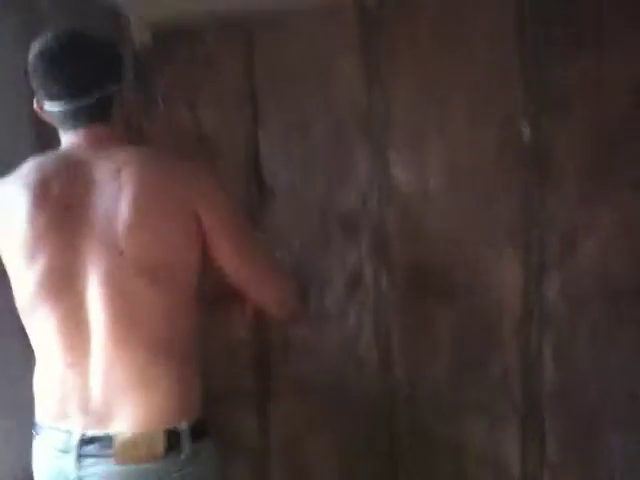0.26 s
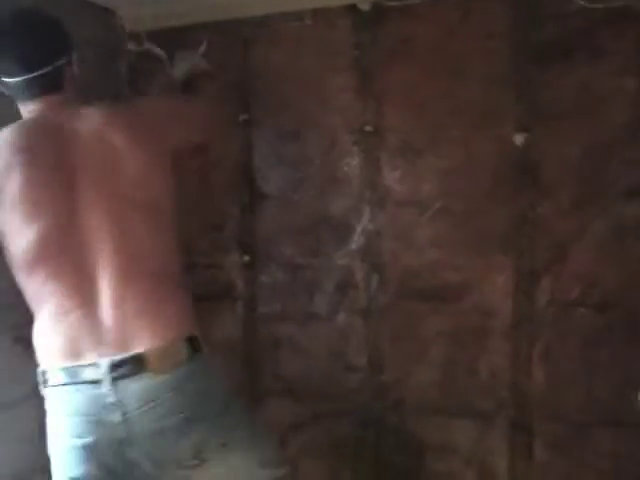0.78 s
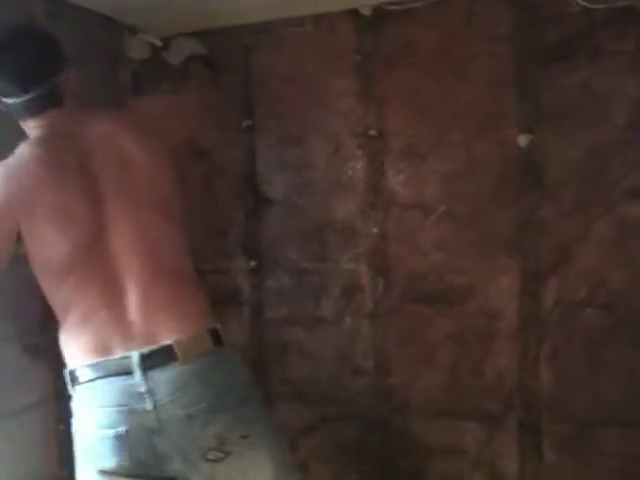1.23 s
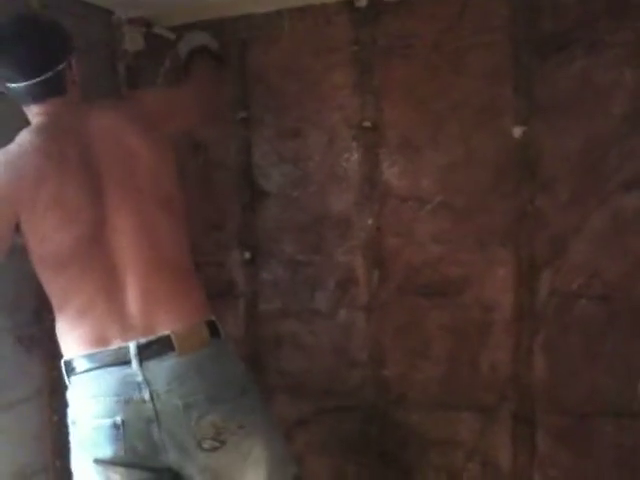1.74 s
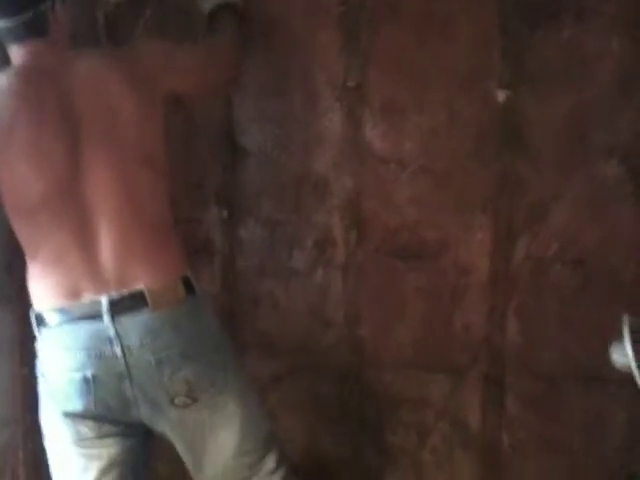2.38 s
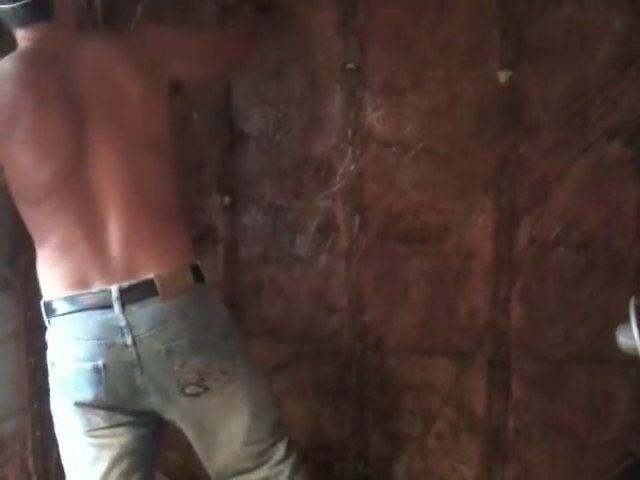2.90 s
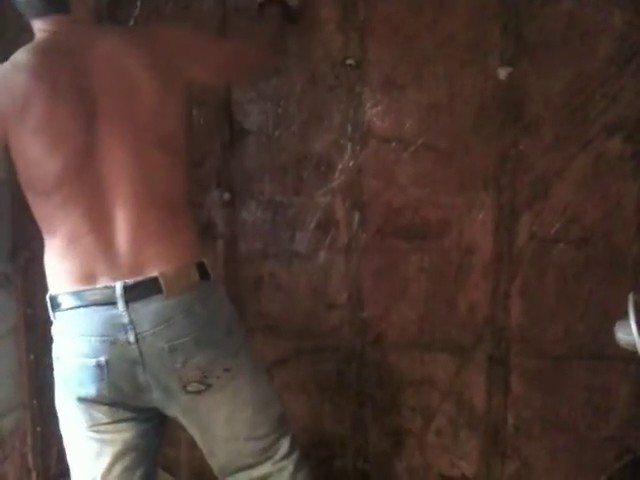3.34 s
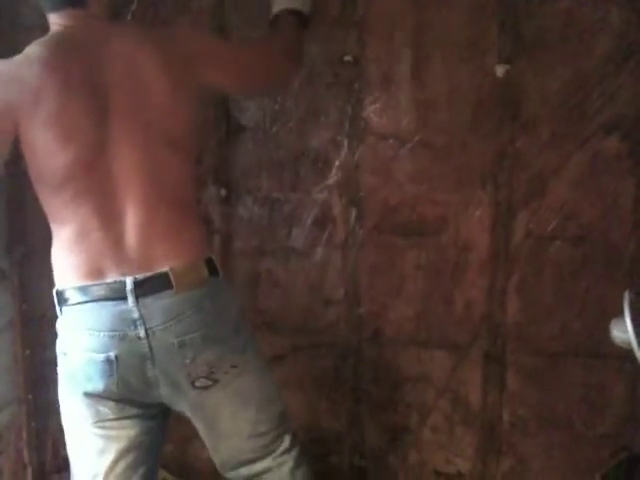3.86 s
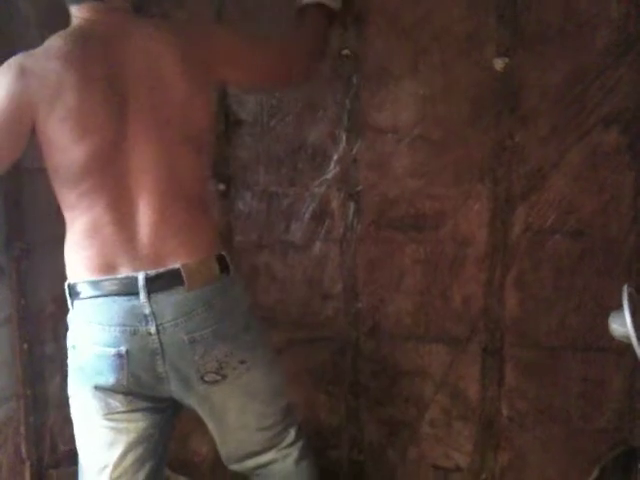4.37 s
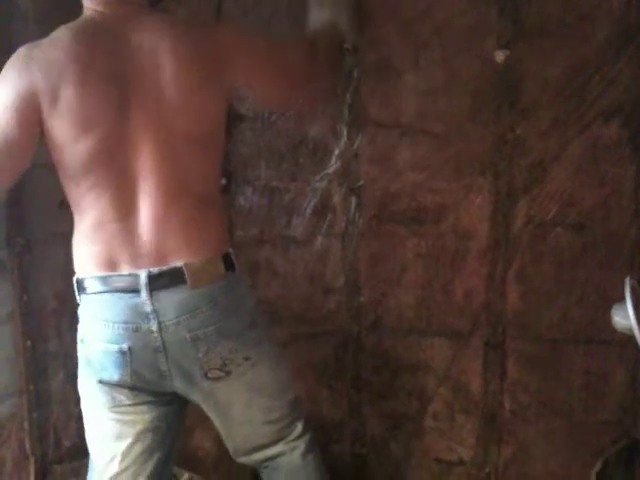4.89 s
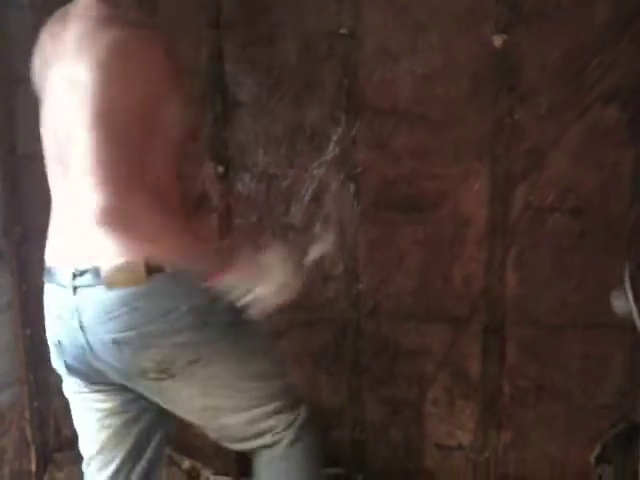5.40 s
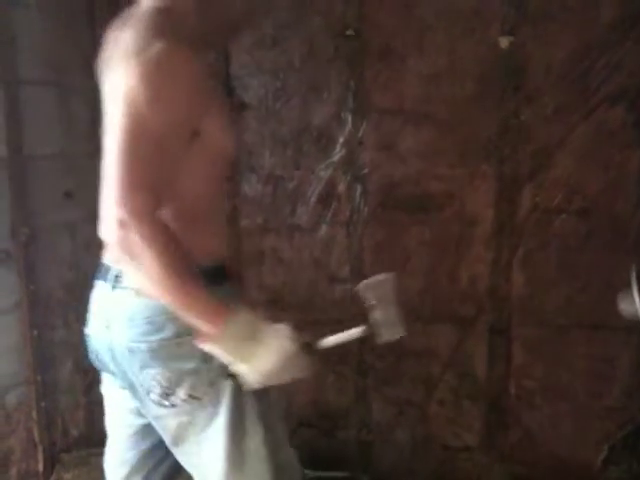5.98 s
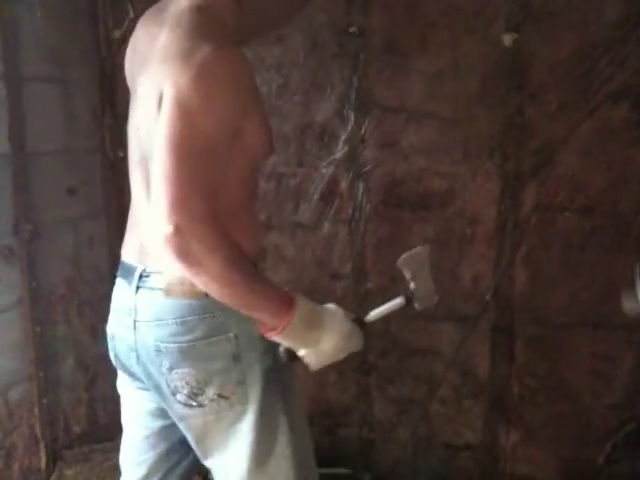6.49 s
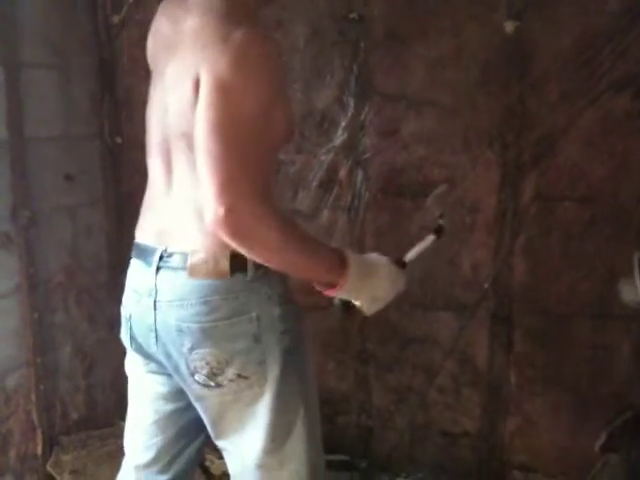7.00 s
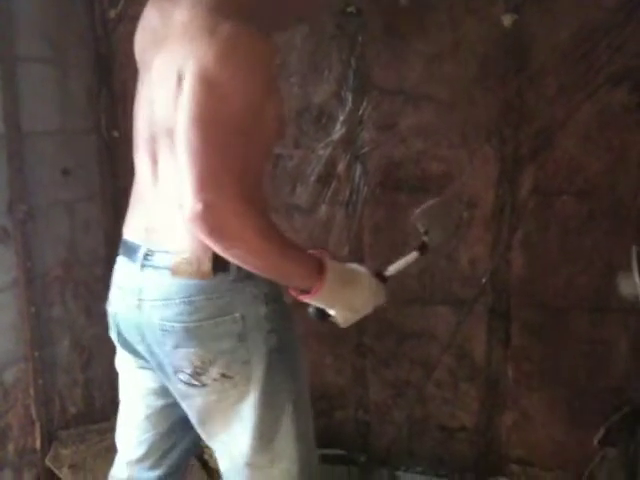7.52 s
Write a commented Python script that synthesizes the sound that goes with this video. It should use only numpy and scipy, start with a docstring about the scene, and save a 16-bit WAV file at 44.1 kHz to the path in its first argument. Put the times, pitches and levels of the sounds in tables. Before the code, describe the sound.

Rapid hatchet blows crack wall tile in a small bare room; shards clatter and clink to the floor, then scattered debris and grit settle.

```python
"""Small bare room: a hatchet knocks tile and mortar off a wall.
Each blow is a crackle burst that cracks the tile broadly and rings the low modes of the wall.
Pieces land as short clacks, some with a sharp tick; shards, blade and a large tile ring in damped modes.
Random clicks form showers of grit and the trickle after each blow.
Filtered noise makes a faint hum and hiss; a limiter holds the loudest blows."""
import sys
import numpy as np
from scipy import signal
from scipy.io import wavfile
from scipy.ndimage import uniform_filter1d, minimum_filter1d

SR = 44100
rng = np.random.default_rng(int(sys.argv[2]) if len(sys.argv) > 2 else 0)


def voltage_ratio(level):
    """Linear amplitude factor for a level in decibels (scalar or array-like)."""
    return 10 ** (np.asarray(level, float) / 20)


def master_out(mix):
    """Clip the mix to full scale and print it as 16-bit PCM to the path in sys.argv[1]."""
    frames = np.transpose(np.atleast_2d(mix))
    ceiling = np.clip(frames, -1, 1)
    pcm = np.round(ceiling * 32767).astype(np.int16)
    wavfile.write(sys.argv[1], SR, pcm)


N = 341289   # samples

# hatchet on wall: [t/s, level/dB, hollow thump/dB, sizzle/dB]
BLOWS = [(1.265, -8, 12, -5), (1.559, -8, 11, -4.5), (1.841, -5, 6, -8.5), (2.134, -3, -2, -8),
         (2.393, -4, -2.5, -10), (2.664, -6, 0.5, -1), (2.938, -3.5, -5.5, -7.5), (3.506, 3, -9, -13.5),
         (4.073, -3.5, -4, -9.5), (4.603, -1, -15.5, -11), (4.873, -5, -6, -2.5)]
# wall modes: [f/Hz, level/dB, t60/s]
WALL_MODES = [(150, -8, .09), (370, -8, .07), (517, 3, .06), (670, 1, .05)]
# broadband spectrum of contacts and grit: [f/Hz, level/dB per Hz]
CRACK_SPECTRUM = [(85, -22), (137, 1.5), (480, -1), (1000, 1), (3500, -0.5), (6000, 5), (9000, 8),
                  (11500, 0), (14000, -12), (17000, -12)]
# pieces landing, small ones bright, heavy ones dull: [t/s, level/dB, tilt/dB per octave]
PIECES = [(0.128, -3.5, -1.2), (0.216, -11, -2.5), (0.328, -30, 0.5), (0.379, -15.5, -2.5),
          (0.985, -16.5, -2.5), (1.099, -21.5, -3.5), (1.255, -28, -1), (2.115, -46, -10.5),
          (2.506, -6.5, -0.5), (2.57, -10, -2), (2.91, -34, 2), (3.05, -16, -0.8), (3.23, -17.5, -3.5),
          (3.538, 5.5, 1.5), (3.599, -10.5, 3), (3.787, -26, -8), (3.882, -12, 0.1), (4.149, -6.5, 1),
          (4.278, -6.5, -2.2), (4.299, -15, -1), (4.308, -1, 0.5), (4.339, 1, 0.5), (4.432, -19, -0.5),
          (4.542, -34, 5.5), (4.789, -37.5, 10), (4.993, -7.5, -1.5), (5.305, -24, -3.5),
          (5.314, -18.5, -2), (5.346, -17, -1), (5.469, -19.5, 3.5), (5.493, -15.5, 0.5),
          (5.553, -17.5, 1.5), (5.571, -4.5, 0), (5.604, -7.5, -1), (5.807, -7, -2.5), (5.876, -14, -2.5),
          (5.957, -17, -5.5), (6.025, -17, -4), (6.181, -16, -3.5), (6.519, -8.5, -4), (6.875, -29.5, -5.5),
          (7.079, -27, -5.5), (7.175, -28, -5), (7.235, -28, 2), (7.367, -18, -0.3), (7.637, -29.5, -2.5),
          (7.716, -19.5, 4.5)]
# colour of a landing of middling size: [f/Hz, level/dB]
CLACK_COLOUR = [(110, -9.5), (500, -0.5), (3500, 5.5), (10000, -2.5)]
# short ringing notes of shards, the hatchet blade and a scrape, some struck together:
# [t/s, level/dB, f/Hz]
SHORT_NOTES = [(0.131, -27, 2790), (0.324, -41.5, 2850), (0.385, -31, 570), (.95, -35, 1075),
               (1.762, -49.5, 6400), (2.393, -15.5, 3390), (2.393, -27.5, 1930), (2.565, -28.5, 1170),
               (2.668, -8.5, 8500), (2.94, -13, 8570), (2.506, -24.5, 1850), (2.507, -25, 4800),
               (2.828, -40.5, 4750), (3.602, -15.5, 8600), (4.343, -11.5, 6260), (4.346, -14, 8400),
               (4.344, -17.5, 10180), (4.432, -30, 9300), (4.997, -19, 9550), (4.077, -17, 3820),
               (4.603, -14, 5750), (4.609, -19, 1020), (4.605, -17, 2465), (4.61, -16, 7300),
               (5.246, -33.5, 6660), (5.257, -41, 5800), (5.33, -28, 5760), (5.606, -20.5, 6270),
               (7.25, -44, 5200), (6.502, -28, 6040), (6.521, -29, 6050), (6.518, -22.5, 8350),
               (6.521, -21, 10400), (6.679, -42, 5880), (7.721, -39.5, 9470)]
# large tile knocking about: [t/s, level/dB]
TILE_KNOCKS = [(3.736, -38.5), (4.148, -8.5), (4.304, -11.5), (4.429, -29)]
# modes of that tile: [f/Hz, level/dB, t60/s]
TILE_MODES = [(2085, -14.5, 0.084), (2522, -15.5, 0.058), (3400, -16.5, .05), (5930, -12, .07),
              (6170, -7, 0.03), (6960, -9, .04), (7360, -8, .05), (9700, -25, .03), (10500, -19.5, .03)]
# sharp ticks, most at the onset of a landing piece: [t/s, level/dB, f/Hz]
TICKS = [(5.496, -8, 6300), (5.577, -14, 3480), (5.805, -4.5, 7100), (5.958, -15, 7700),
         (6.028, -11.5, 7740), (7.09, -22.5, 8050), (7.237, -30, 4640), (7.338, -37, 6000),
         (7.367, -22, 8500)]
# showers of grit and scuffs: [full from t/s, hold/s, fine grit level/dB, coarse crumb level/dB]
SHOWERS = [(0, .1, -62, -69), (0.648, 0.072, -66, -58), (0.948, 0.0064, -43.5, -45.5),
           (2.074, 0.018, -49.5, -83), (2.766, 0.045, -49, -52.5), (3.732, 0.024, -45, -49),
           (4.197, 0.066, -37, -63), (5.13, 0.014, -45, -59.5), (5.328, 0.0066, -38.5, -46.5),
           (5.485, 0.0096, -39, -44), (5.612, 0.059, -37.5, -43.5), (5.91, 0.13, -42, -44),
           (6.334, 0.037, -48, -57), (6.443, 0.028, -47.5, -52.5), (6.65, 0.0072, -47, -52),
           (6.817, 0.014, -52, -57.5), (7.062, 0.046, -50, -56), (7.287, 0.1, -49.5, -58),
           (7.384, 0.28, -47, -55.5)]
# decay of the room: [f/Hz, t60/s]
ROOM_T60 = [(100, 0.25), (260, 0.25), (700, 0.16), (1840, 0.18), (4850, 0.22), (12800, 0.16)]
# relative spectrum of hiss and rumble: [f/Hz, level/dB per Hz]
AIR_SPECTRUM = [(24, -57), (40, -46.5), (233, 7.5), (510, -2), (639, -2), (4680, -14.5), (6020, -8),
                (8570, -10.5), (14500, -29), (16500, -48)]
# hum tones: [f/Hz, rms level/dB]
HUM = [(242.2, -66.5), (360.7, -72.5)]
# half-octave bands
EDGES_HZ = 40 * 2 ** np.arange(0, 9.1, .5)
CENTRES_HZ = np.sqrt(EDGES_HZ[1:] * EDGES_HZ[:-1])


def rms_one(x):
    """Scale to unit rms."""
    return x / np.sqrt(np.mean(x ** 2) + 1e-20)


def at_hz(points, hz):
    """Read a (f/Hz, value) table on a log frequency axis."""
    points = np.array(points)
    return np.interp(np.log(hz), np.log(points[:, 0]), points[:, 1])


def band(x, k):
    """Half-octave band k; signs alternate so that neighbours add at their edges."""
    sos = signal.butter(2, EDGES_HZ[k:k + 2], "band", fs=SR, output="sos")
    return (-1) ** k * signal.sosfilt(sos, x + 1e-18)


def ring(push, hz, t60_s):
    """Two-pole resonator: a unit click sets a decaying sine of about unit height ringing."""
    r = voltage_ratio(-60 / (t60_s * SR))
    w = 2 * np.pi * min(hz, 18000) / SR
    return signal.lfilter([0, np.sin(w)], [1, -2 * r * np.cos(w), r * r], push + 1e-18)


def grains(count, per_s, spread_db):
    """Random clicks of uneven size and sign; rms 1."""
    born = rng.random(count) < per_s / SR
    size_db = spread_db * np.minimum(rng.exponential(1, count), 4)
    return rms_one(born * voltage_ratio(size_db) * rng.choice([-1, 1], count))


def contact(crackle, t_s, decay_ms, rise_ms):
    """Start sample and dying crackle of one contact (exponential time constants)."""
    i = round(t_s * SR)
    t = np.arange(min(SR // 4, N - i)) / SR
    shape = (1 - np.exp(-1000 * t / rise_ms)) * np.exp(-1000 * t / decay_ms)
    push = crackle[i:i + len(t)] * shape
    # the impact sets the energy, not the grain
    return i, push * np.sqrt(np.sum(shape ** 2) / np.sum(push ** 2))


def blows(crackle):
    """The tile cracks broadly; the wall thumps in its low modes, less as it breaks up."""
    crumble_ms, wall_db = 5.1, -43
    knock_db, knock_per_thump = -1.5, 0.5
    contacts, thumps = [], np.zeros(N)
    chance_db = rng.normal(0, 2.0, (len(BLOWS), len(WALL_MODES)))
    for (t_s, db, thump_db, sizzle_db), luck_db in zip(BLOWS, chance_db):
        i, push = contact(crackle, t_s, crumble_ms, rise_ms=0.64)
        mid_db = knock_db + knock_per_thump * thump_db
        colour = [(250, db + thump_db), (1200, db + mid_db), (4000, db), (10000, db + sizzle_db)]
        contacts.append((i, push, colour))
        for (hz, mode_db, t60_s), mode_luck_db in zip(WALL_MODES, luck_db):
            gain = voltage_ratio(wall_db + db + thump_db + mode_db + mode_luck_db)
            thumps[i:i + len(push)] += gain * ring(push, hz, t60_s)
    return contacts, thumps


def pieces(crackle):
    """Each landing is a short clack, tilted about its middle pitch by the size of the piece."""
    middle_hz = CLACK_COLOUR[2][0]
    contacts = []
    for t_s, db, tilt in PIECES:
        i, push = contact(crackle, t_s, 2.87, rise_ms=4.94)
        colour = [(hz, db + level + tilt * np.log2(hz / middle_hz)) for hz, level in CLACK_COLOUR]
        contacts.append((i, push, colour))
    return contacts


def cracks(contacts, wet_db, uneven_db):
    """Contacts in unevenly coloured bands; their energy fills the room as a dying diffuse field."""
    out, white = np.zeros(N), rng.standard_normal(N)
    uneven = rng.normal(0, uneven_db, (len(contacts), len(CENTRES_HZ)))
    for k, hz in enumerate(CENTRES_HZ):
        push = np.zeros(N)
        for (i, crackle, colour), own_db in zip(contacts, uneven):
            push[i:i + len(crackle)] += crackle * voltage_ratio(at_hz(colour, hz) + own_db[k])
        r = voltage_ratio(-120 / (at_hz(ROOM_T60, hz) * SR))   # energy falls 60 dB in t60
        stored = signal.lfilter([1 - r], [1, -r], push ** 2 + 1e-18)
        diffuse = voltage_ratio(wet_db) * np.sqrt(stored) * white
        out += voltage_ratio(at_hz(CRACK_SPECTRUM, hz)) * band(push + diffuse, k)
    return out


def chimes(crackle):
    """Each note is three randomly detuned close modes driven by crackle, so it rings roughly."""
    notes = [(t_s, db, hz, .018) for t_s, db, hz in SHORT_NOTES]
    for t_s, db in TILE_KNOCKS:
        notes += [(t_s, db + mode_db, hz, t60_s) for hz, mode_db, t60_s in TILE_MODES]
    # seven clinks at random high pitches colour each landing
    pitches_hz = 3500 * 2 ** rng.uniform(0, 1.7, (len(PIECES), 7))
    for (t_s, db, _), clinks_hz in zip(PIECES, pitches_hz):
        notes += [(t_s, db - 24.0, hz, 6.3 / hz) for hz in clinks_hz]
    out = np.zeros(N)
    detune = 1 + rng.normal(0, .011, (len(notes), 3))
    for (t_s, db, hz, t60_s), ratios in zip(notes, detune):
        i, push = contact(crackle, t_s, 9.5, rise_ms=1.0)
        push = voltage_ratio(db) * push / np.sqrt(np.sum(push ** 2))
        out[i:i + len(push)] += sum(ring(push, hz * ratio, t60_s) for ratio in ratios)
    return out


def ticks():
    """One click into a heavily damped resonator, which falls 60 dB in 28 cycles."""
    out = np.zeros(N)
    for t_s, db, hz in TICKS:
        click = np.zeros(SR // 50)
        click[0] = voltage_ratio(db)
        out[round(t_s * SR):][:len(click)] += ring(click, hz, 28 / hz)
    return out


def grit_flow():
    """Fine and coarse gain: showers swell, hold, thin; blows leave a slow trickle; powers add."""
    swell_db_per_s, thin_db_per_s = 480, 119
    trickle_db, trickle_thins_db_per_s, trickle_coarse_db = -52.5, 36, -5
    t = np.arange(0, N + 64, 64) / SR
    power = 0
    for t_s, hold_s, *db in SHOWERS:
        swell_db = swell_db_per_s * np.maximum(t_s - t, 0)
        thin_db = thin_db_per_s * np.maximum(t - t_s - hold_s, 0)
        power = power + voltage_ratio(np.array(db)[:, None] - swell_db - thin_db) ** 2
    fine_coarse = voltage_ratio(np.array([[0], [trickle_coarse_db]]))
    for t_s, db, *_ in BLOWS:
        trickle = (t > t_s) * voltage_ratio(db + trickle_db - trickle_thins_db_per_s * (t - t_s))
        power = power + (trickle * fine_coarse) ** 2
    return [np.interp(np.arange(N) / SR, t, np.sqrt(p)) for p in power]


def grit():
    """Dense tiny impacts: fine grit is bright and some chips clink, crumbs and scuffs are dull."""
    split_hz = 2600
    fine_gain, coarse_gain = grit_flow()
    fine, coarse = grains(N, 2500, 4), grains(N, 900, 4.5)
    bright, dull = np.zeros(N), np.zeros(N)
    for k, hz in enumerate(CENTRES_HZ):
        gain = voltage_ratio(at_hz(CRACK_SPECTRUM, hz))
        if hz > split_hz:
            bright += gain * band(fine, k)
        else:
            dull += gain * band(coarse, k)
    clink_hz = np.geomspace(3800, 10500, num=14)
    clinks = sum(ring(grains(N, 12, 4.0), hz, 90 / hz) for hz in clink_hz)
    bright = rms_one(bright) + voltage_ratio(-10.5) * rms_one(clinks)
    return fine_gain * bright + coarse_gain * rms_one(dull)


def room(x, wet_db):
    """Dense reflections that build in a few ms and die band by band."""
    t = np.arange(SR // 2) / SR
    white = rng.standard_normal((2, len(t)))
    tail = np.zeros(len(t))
    for k, hz in enumerate(CENTRES_HZ):
        tail += band(white[k % 2], k) * voltage_ratio(-60 * t / at_hz(ROOM_T60, hz))
    tail *= 1 - np.exp(-t / 0.0018)
    tail /= np.sqrt(np.sum(tail ** 2))
    return x + voltage_ratio(wet_db) * signal.fftconvolve(x, tail)[:N]


def air():
    """Steady hiss and rumble from banded noise; noise-driven resonators give two wavering hums."""
    white = rng.standard_normal((2, N))
    hiss = sum(voltage_ratio(at_hz(AIR_SPECTRUM, hz)) * band(white[k % 2], k) for k, hz in enumerate(CENTRES_HZ))
    hum = sum(voltage_ratio(db) * rms_one(ring(white[0], hz, 0.99)) for hz, db in HUM)
    return voltage_ratio(-64) * rms_one(hiss) + hum


def scene():
    """Everything on the wall and floor sounds in the same room, over the air."""
    crackle = grains(N, 9000, 2.3)
    struck, thumps = blows(crackle)
    broad = cracks(struck + pieces(crackle), wet_db=4.5, uneven_db=1.5)
    ringing = room(thumps + chimes(crackle) + grit(), wet_db=0.5)
    sharp = room(ticks(), wet_db=-4.0)
    return (broad + ringing + sharp + air())[None]


def band_limit(x):
    """A steep low-pass at the top of the band."""
    return signal.sosfilt(signal.butter(12, 16960, fs=SR, output="sos"), x)


def record(dry):
    """A low-pass cuts the top near 17 kHz, a high-pass thins the deep bass, a fast limiter holds the blows."""
    x = signal.sosfilt(signal.cheby2(10, 50, 16900, fs=SR, output="sos"), dry)
    x = signal.sosfilt(signal.butter(2, 85, "high", fs=SR, output="sos"), x)
    ceiling_gain = np.minimum(1, .76 / (np.abs(x) + 1e-9))
    # hold the lowest gain, then ease in and out of it
    gain = uniform_filter1d(minimum_filter1d(ceiling_gain, size=61), size=61)
    return band_limit(x * gain)


dry = scene()
out = record(dry)
master_out(out)
```